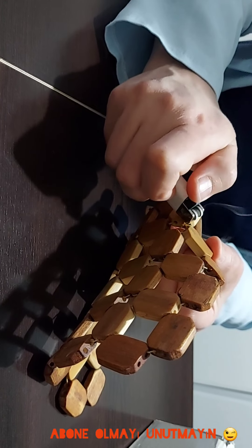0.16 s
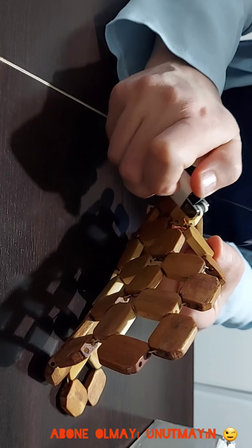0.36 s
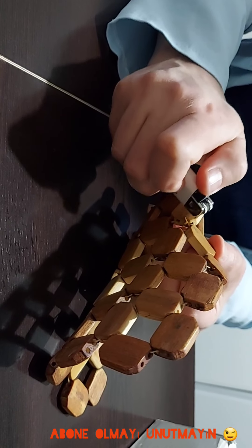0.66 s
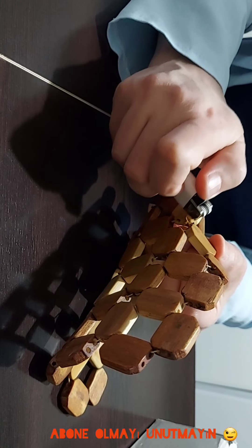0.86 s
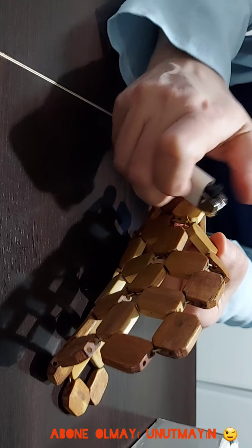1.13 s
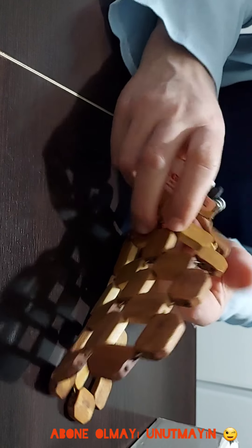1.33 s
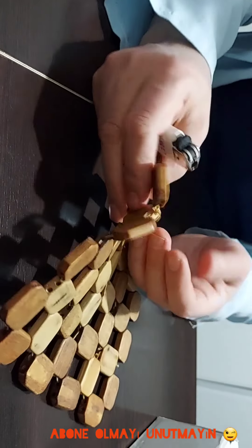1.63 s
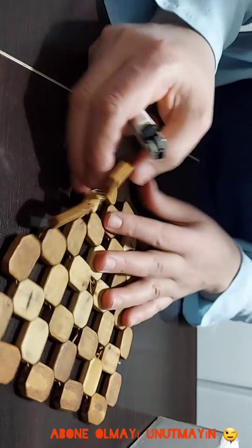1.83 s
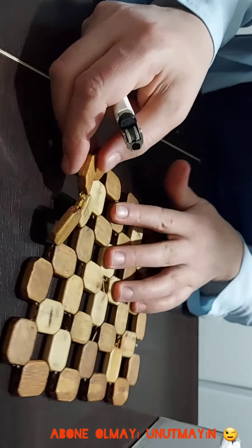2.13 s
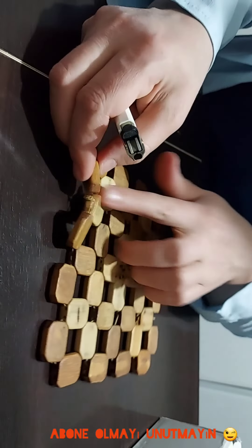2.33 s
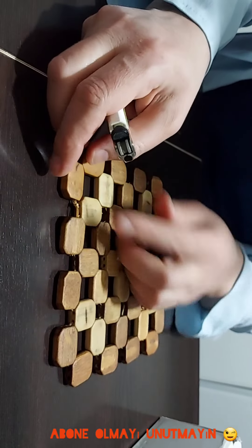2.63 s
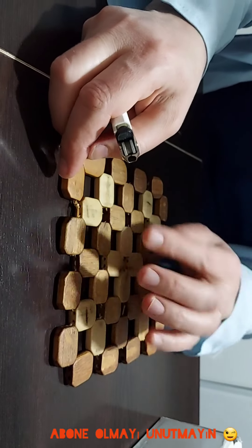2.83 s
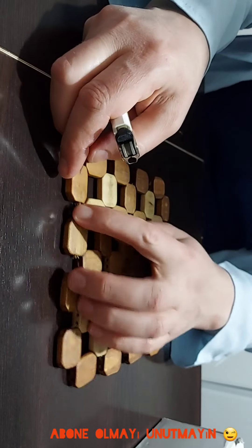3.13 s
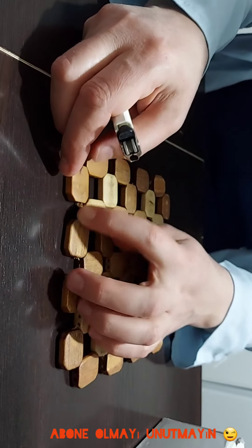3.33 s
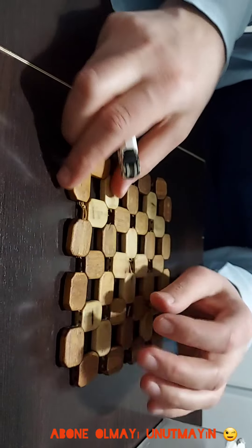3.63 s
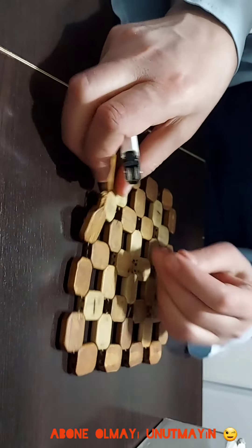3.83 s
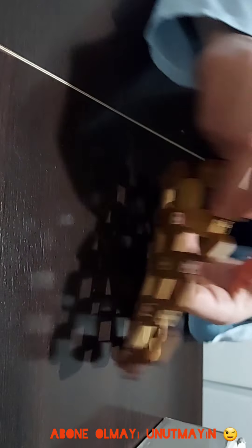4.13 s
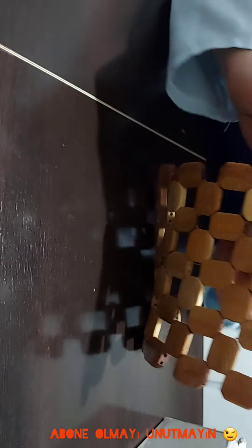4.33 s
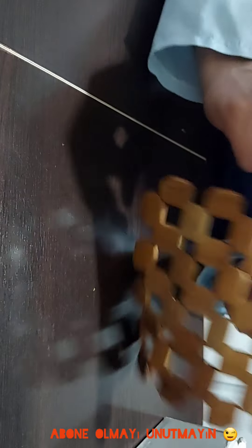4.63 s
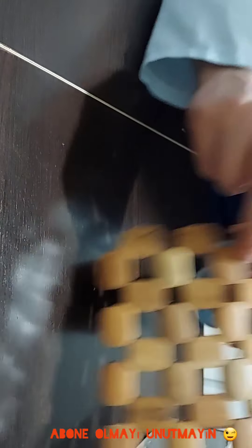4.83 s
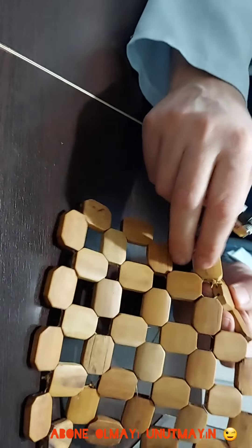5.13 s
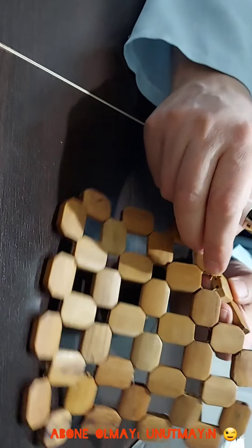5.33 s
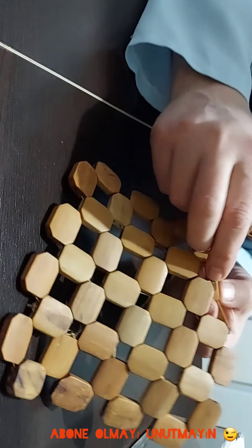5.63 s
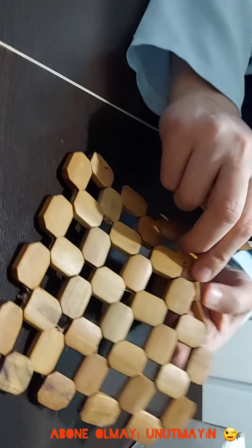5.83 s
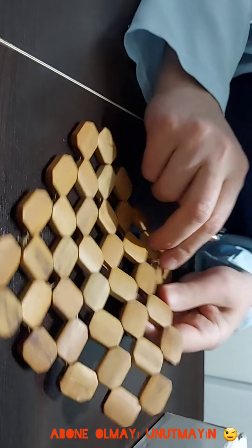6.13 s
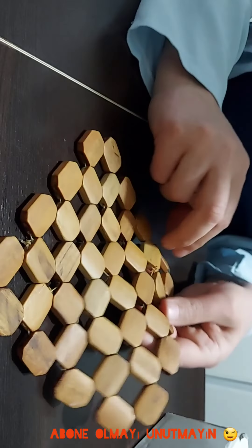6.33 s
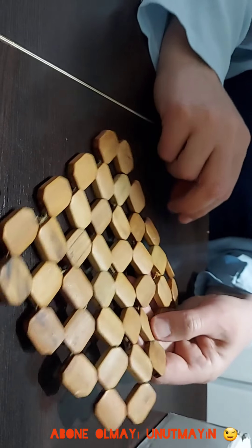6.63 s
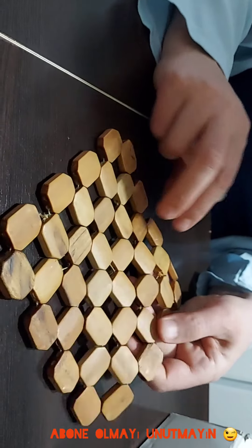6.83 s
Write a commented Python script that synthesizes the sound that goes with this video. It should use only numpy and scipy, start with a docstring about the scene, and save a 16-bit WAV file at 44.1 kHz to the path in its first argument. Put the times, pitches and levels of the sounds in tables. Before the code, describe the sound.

Small wooden tiles on cord click and clack sharply against each other, land on a tabletop with a dense short rattle, and are picked up again in a bare room.

```python
"""An engine outside hums and rushes at first and fades, while a mat of small wooden tiles strung on cord gives thin ticks.
The mat is turned over, laid flat near five seconds, where its tiles rattle as they settle, and picked up again.
Tiles clack with short rings, the tabletop booms, and filtered noise makes the rustle of sleeves and scrape of wood.
Decaying noise adds the echoes of a bare room."""
import sys
import numpy as np
from scipy import signal
from scipy.io import wavfile
from scipy.ndimage import uniform_filter1d

SR = 44100
rng = np.random.default_rng(int(sys.argv[2]) if len(sys.argv) > 2 else 0)


def waveform_to_disk(signal):
    """Save audio, clipped to [-1, 1], as 16-bit WAV at the path in sys.argv[1]."""
    frames = np.transpose(np.atleast_2d(signal))
    scaled = np.clip(frames, -1, 1) * 32767
    samples = np.round(scaled).astype(np.int16)
    wavfile.write(sys.argv[1], SR, samples)


N = 307818
TIME = np.arange(N) / SR
# thud level of a usual contact, relative to its ring (dB)
THUD_DB = -14.0

# the ringing tones of one tile of ordinary size: f/Hz, level/dB, time to fall by 60 dB t60/s
TILE_MODES = [(1810, -14.5, 0.048), (2440, -3, 0.033), (2780, 1.5, 0.032), (3354, -4, .021),
              (3792, -1.5, 0.034), (4274, 0, 0.022), (4878, -4, 0.022), (5337, -1, 0.013),
              (7230, -5, 0.015), (7515, -3, 0.018), (9360, 4.5, 0.0091), (11700, -29, 0.013),
              (14600, -35, 0.01)]


def from_db(db):
    """Turn decibels into a gain."""
    return 10 ** (np.asarray(db) / 20)


def rms_one(x):
    """Scale to an rms of 1."""
    return x / np.sqrt(np.mean(x ** 2) + 1e-20)


def in_time(rows):
    """Read each column of a timed table at every sample."""
    s, *columns = np.transpose(rows)
    return [np.interp(TIME, s, column) for column in columns]


def at_hz(points, hz):
    """Read a table between its points, on a log-frequency axis."""
    table_hz, values = np.transpose(points)
    return np.interp(np.log(hz), np.log(table_hz), values)


def band_pass(x, low_hz, high_hz, order=2):
    """Keep only the sound between two frequencies."""
    sos = signal.butter(order, [low_hz, high_hz], "band", fs=SR, output="sos")
    return signal.sosfilt(sos, x)


def drift(rate_hz):
    """Make a slowly wandering random curve with spread 1."""
    step = 40  # samples between computed points
    r = np.exp(-2 * np.pi * rate_hz * step / SR)
    noise = rng.standard_normal(N // step + 2002)
    slow = signal.lfilter([1], [1, -2 * r, r * r], noise)[2000:]  # drop the filter's start-up
    return np.interp(np.arange(N) / step, np.arange(len(slow)), rms_one(slow))


def add(out, s, sound):
    """Mix a sound in at time s."""
    start = round(s * SR)
    out[:, start:start + sound.shape[1]] += sound[:, :N - start]


def place(sound, pan_db, lag_ms):
    """Lean a sound left (positive pan) at constant power and delay it at the right microphone."""
    t = np.arange(sound.shape[1]) / SR
    right = np.interp(t - lag_ms / 1000, t, sound[1], left=0)
    lean = pan_db / 2
    return np.array([sound[0], right]) * rms_one(from_db([[lean], [-lean]]))


def diffuse_bands(size):
    """Split stereo noise into narrow bands that sum to white; the sides are alike only in the bass."""
    # how alike left and right are in sound from all around: f/Hz, correlation/1
    likeness = [(60, .93), (250, .82), (500, .42), (1000, .02), (2000, -.22), (5000, -.1), (14000, .05)]
    edges = 22 * 2 ** np.arange(0, 9.7, .4)
    white = rng.standard_normal((2, 2, size))
    bands = []
    for k, (low, high) in enumerate(zip(edges, edges[1:])):
        # neighbouring bands use different noise
        mid, side = band_pass(white[k % 2], low, high)
        hz = np.sqrt(low * high)
        alike = at_hz(likeness, hz)
        shared = np.sqrt((1 + alike) / 2) * mid
        opposed = np.sqrt((1 - alike) / 2) * side * [[1], [-1]]
        bands.append((hz, shared + opposed))
    return bands


def coloured(bands, spectrum):
    """Weight noise bands by a spectrum and scale to rms 1."""
    return rms_one(sum(from_db(at_hz(spectrum, hz)) * noise for hz, noise in bands))


def ring(modes, t, size_ratio, spread_db):
    """Sum struck, dying tones; each reaches each microphone with its own strength and sign."""
    hz, db, t60 = np.transpose(modes)[:, :, None]
    shape = (2, len(modes))
    strength = from_db(rng.normal(0, spread_db, shape)) * rng.choice([-1, 1], shape)
    tones = from_db(db - 60 * t / t60) * np.sin(2 * np.pi * hz * size_ratio * t)
    return strength @ tones


def still_air(bands):
    """The quiet of the room is steady coloured noise."""
    # colour of the quiet: f/Hz, relative level/dB per Hz
    quiet = [(15, -38), (25, -10), (72, 7), (137, -1), (180, -8), (416, -20.5), (754, -19), (1400, -13),
             (2350, -20.5), (3080, -28), (7510, -25.5), (9320, -33.5), (16000, -46.5)]
    return from_db(-66) * coloured(bands, quiet)[:, ::-1]  # reversed in time


def engine_hum(pitch_hz, hum_db, far_hum_db=-69.5, waver_db=-0.7, pan_db=-3.7):
    """The engine's firing tone is a wavering sine that fades to a far drone."""
    gain = np.hypot(from_db(hum_db), from_db(far_hum_db)) * from_db(waver_db * drift(5))
    hum = np.sqrt(2) * np.sin(2 * np.pi * np.cumsum(pitch_hz) / SR) * gain
    return place(np.array([hum, hum]), pan_db, 0)


def engine_rush(bands, hum_db, start_db=-45.4, share_of_fall=0.58):
    """The engine's rush is coloured noise that falls by a share of the hum's fall in decibels."""
    # colour of the rush: f/Hz, relative level/dB per Hz
    rush = [(30, 1.5), (60, 13), (100, 7.5), (135, 16), (175, -1), (250, 13), (380, -8), (550, -0.5),
            (800, 6), (1150, 5), (1700, -4), (2600, -14), (4500, -24.5), (9000, -36)]
    return from_db(start_db + share_of_fall * (hum_db - hum_db[0])) * coloured(bands, rush)


def background(fade_db_per_s=11, rush_pan_db=-3.5, hiss_db=-80.0):
    """The engine comes through the walls over the room's still air and the microphones' hiss."""
    # the engine while it is close: t/s, f/Hz, hum level/dB
    engine = [(0.03, 74.6, -36), (0.562, 75, -40.5), (1.296, 74.7, -51), (1.47, 73.2, -64)]
    pitch_hz, hum_db = in_time(engine)
    hum_db = hum_db - fade_db_per_s * np.maximum(TIME - engine[-1][0], 0)
    bands = diffuse_bands(N)
    noise = engine_rush(bands, hum_db) + still_air(bands)
    microphone_hiss = from_db(hiss_db) * rng.standard_normal((2, N))
    return engine_hum(pitch_hz, hum_db) + place(noise, rush_pan_db, 0) + microphone_hiss


def room_response(nearest_wall_s=0.00076, thicken_s=0.009, uneven_db=6.0):
    """Wall echoes thicken within milliseconds into a tail whose treble dies first."""
    # how long echoes last: f/Hz, time to fall by 60 dB t60/s
    decay_times = [(100, .62), (260, .58), (700, .55), (1840, .46), (4850, .41), (8000, .38), (14000, .3)]
    # strength of the tail before it is shaped: f/Hz, level re direct sound/dB
    tail_levels = [(100, 7.5), (400, -3.5), (1000, 1.5), (1800, -2), (2800, -6), (5000, -8), (8000, -13),
                   (14000, -5)]
    t = np.arange(SR) / SR
    tail = 0
    for hz, noise in diffuse_bands(SR):
        t60 = at_hz(decay_times, hz)
        one_energy = np.sqrt(np.log(1e6) / (t60 * SR))  # long and short decays carry equal energy
        tail = tail + noise * from_db(at_hz(tail_levels, hz) - 60 * t / t60) * one_energy
    # early lumps stand out of the wash like single reflections
    lump = rms_one(uniform_filter1d(rng.standard_normal(SR), size=50))
    lumps = from_db(uneven_db * lump * np.exp(-t / 0.045))
    return tail * lumps * np.clip((t - nearest_wall_s) / thicken_s, 0, 1)


def room(x):
    """Sound thrown to either side takes its own paths round the walls to both microphones."""
    echoes = [signal.fftconvolve(side[None], room_response(), axes=1)[:, :N] for side in x]
    return sum(echoes) / np.sqrt(2)


def tabletop(slap_t60=.05, slap_per_softness=-1.0, low_hz=430, high_hz=1400):
    """The board booms when mat or hand lands: soft landings favour its low tones, hard ones slap."""
    # landings: t/s, relative level/dB, softness (tilt towards the bass)/dB per octave
    bumps = [(1.9027, -51, 7.5), (2.462, -49, 6), (3.1123, -58.5, 7), (3.3048, -59, 6), (4.9333, -42, -0.5),
             (4.9606, -32, -3), (5.4474, -59, 3), (6.1754, -57, 5.5), (6.4307, -56, -4), (6.889, -56, -4.5)]
    # the board's tones before a slight lowering: f/Hz, level/dB, time to fall by 60 dB t60/s
    table_modes = [(59.5, -11, 0.13), (91.5, -11.5, 0.099), (130, -12, .09), (188.5, -6.5, 0.039),
                   (250, -2, .06), (324, 1.5, 0.063), (466, 2, 0.038), (540, 0, 0.038), (579, 0.5, 0.075),
                   (730, 4.5, 0.07)]
    out, t, modes = np.zeros((2, N)), np.arange(SR // 2) / SR, np.array(table_modes)
    octaves_down = np.log2(modes[:, :1].mean() / modes[:, :1])
    for s, db, softness in bumps:
        tilted = modes + softness * octaves_down * [0, 1, 0]
        boom = ring(tilted, t, 0.97, spread_db=1.85)[:1]  # the same on both sides
        noise = rms_one(band_pass(rng.standard_normal((2, len(t))), low_hz, high_hz))
        slap = noise * from_db(slap_per_softness * softness - 60 * t / slap_t60)
        add(out, s, from_db(db) * (boom + slap))
    return out


def bell(s, length_s, rise_share=.45, end_db=-6.0):
    """A stroke swells and falls; give its samples and its gain."""
    near = slice(max(round((s - 2 * length_s) * SR), 0), round((s + 2 * length_s) * SR))
    t = TIME[near] - s
    side_s = length_s * np.where(t < 0, rise_share, 1 - rise_share)
    return near, from_db(end_db * (t / side_s) ** 2)  # end_db holds at the stroke's two ends


def stroke_gains():
    """The hands' strokes raise and lower the gains of sleeve, scrape and cord."""
    # strokes that shift the mat: t/s at the height, length/s,
    # then relative levels of sleeve rustle/dB, tile scrape/dB, cord hiss/dB
    strokes = [(1.222, 0.38, -76, -67, -70), (1.442, .1, -61, -58, -78), (1.755, 0.045, -67, -59, -59),
               (1.85, .2, -62.5, -62, -72.5), (2.272, 0.37, -51, -52, -67), (3.011, 0.13, -69, -80, -70),
               (3.44, .11, -62.5, -59.5, -72.5), (3.855, 0.25, -56, -57.5, -66.5),
               (4.09, 0.29, -69, -66, -71.5), (4.31, .08, -65, -46, -57.5), (4.455, 0.074, -70, -60, -74),
               (4.65, .08, -63, -52, -69), (4.703, 0.039, -60, -44, -57), (5.464, 0.09, -53, -59, -67.5),
               (5.564, 0.32, -68, -67, -77), (6.081, 0.06, -62, -58, -68), (6.29, 0.29, -66.5, -72, -67.5),
               (6.43, .05, -58, -62, -72), (6.673, 0.12, -59, -58, -68.5), (6.91, .12, -63, -57, -76)]
    # between strokes, one number each for sleeve, scrape and cord: relative level/dB
    resting_db = [-78, -87, -94]
    power = from_db(resting_db)[:, None] ** 2 * np.ones(N)
    for s, length_s, *levels_db in strokes:
        near, gain = bell(s, length_s)
        power[:, near] += (from_db(levels_db)[:, None] * gain) ** 2
    return np.sqrt(power)


def jostle(per_s=500, size_db=3.0, ring_hz=3100, width_hz=1200):
    """Loose tiles touch lightly and at random, each ringing for a moment; rms 1."""
    t, out = np.arange(SR // 50) / SR, 0
    for size_ratio in np.linspace(.72, 1.02, 6):
        sizes = from_db(size_db * np.minimum(rng.exponential(1, N), 3))
        taps = (rng.random(N) < per_s / 6 / SR) * sizes
        tile = ring(TILE_MODES, t, size_ratio, spread_db=8.5)
        out = out + signal.oaconvolve(taps[None], tile, axes=1)[:, :N]
    # light touches wake mainly the lowest bending tones
    return rms_one(band_pass(out, ring_hz - width_hz, ring_hz + width_hz))


def catches(per_s=30, size_db=4.0, hardness_db=-3.0):
    """Edges catch on each other and let go in tiny dry clicks; rms 1."""
    sizes = from_db(size_db * np.minimum(rng.exponential(1, N), 3))
    return rms_one(shower((rng.random(N) < per_s / SR) * sizes, THUD_DB, hardness_db))


def handling(slip_db=-2.5, fibre_db=3.0, cloth_db=1.7, friction_db=-3.0, jostle_db=-2.0, catch_db=-7.0):
    """Cloth brushes smoothly; wood and cord slide in tiny uneven slips and the tiles jostle."""
    # colour of sleeve cloth: f/Hz, relative level/dB per Hz
    sleeve_colour = [(120, -1.5), (250, -2), (600, 1.5), (1100, 0.5), (1700, -6.5), (3000, -31)]
    # colour of wood scraping: f/Hz, relative level/dB per Hz
    scrape_colour = [(1000, -36.5), (1700, -4.5), (2400, -3.5), (3300, -5.5), (4600, 1), (6000, -15),
                     (9000, -42.5), (14000, -36.5)]
    # colour of cord hissing: f/Hz, relative level/dB per Hz
    cord_colour = [(4000, -25.5), (6000, 4.5), (7600, 6.5), (9500, -6), (12000, -38.5), (16000, -30.5)]
    sleeve_gain, scrape_gain, cord_gain = stroke_gains()
    bands = diffuse_bands(N)
    slips = (drift(75) + drift(360)) / np.sqrt(2)
    sleeve = rms_one(coloured(bands, sleeve_colour) * from_db(cloth_db * drift(36)))
    friction = rms_one(coloured(bands, scrape_colour) * from_db(slip_db * slips))
    wood = from_db(friction_db) * friction + from_db(jostle_db) * jostle() + from_db(catch_db) * catches()
    cord = rms_one(coloured(bands, cord_colour) * from_db(fibre_db * slips))
    return sleeve_gain * sleeve + scrape_gain * wood + cord_gain * cord


def grinding(slips_per_s=900, width_hz=270, upper_ratio=1.8, upper_db=-9.0, flutter_db=3.0):
    """A tile face grinds over its neighbour; uneven slips keep its lowest two bending tones ringing."""
    # grinds: t/s at the height, length/s, relative level/dB, pitch f/Hz
    grinds = [(1.44, .08, -52.5, 2600), (4.35, .1, -47, 2500), (4.47, .08, -58, 2250),
              (4.655, .09, -51, 2350), (5.93, .09, -63, 2300), (6.67, .1, -59, 2550),
              (6.92, .08, -55, 2450)]
    out, flutter = np.zeros((2, N)), from_db(flutter_db * drift(35))
    slips = (rng.random(N) < slips_per_s / SR) * rng.standard_normal((2, N)) * flutter
    for s, length_s, db, hz in grinds:
        near, gain = bell(s, length_s)
        low_hz, high_hz = hz - width_hz, hz + width_hz
        low = rms_one(band_pass(slips[:, near], low_hz, high_hz))
        upper = rms_one(band_pass(slips[:, near], low_hz * upper_ratio, high_hz * upper_ratio))
        out[:, near] += from_db(db) * gain * (low + from_db(upper_db) * upper)
    return out


def ticks(crack_db=-2.0, crack_t60=0.021, low_hz=4000, high_hz=9500):
    """Small bright contacts, a few short tones and a dry crack, while the mat's corner is held still."""
    # ticks: t/s, burst level/dB, left over right/dB
    tick_times = [(0.2121, -43.5, -2), (0.5701, -46, 1), (0.843, -45, 6), (1.0835, -43, 5)]
    # tones of a tick before a small random shift: f/Hz, level/dB, time to fall by 60 dB t60/s
    tick_modes = [(2647, -2.5, .022), (4150, -4, .009), (5200, 1.5, .008), (7250, 0, .008), (8500, 1, .007)]
    out, t = np.zeros((2, N)), np.arange(SR // 20) / SR
    for s, db, pan_db in tick_times:
        burst = rng.standard_normal((2, len(t))) * from_db(-60 * t / crack_t60)
        crack = rms_one(band_pass(burst, low_hz, high_hz, order=4))
        tones = rms_one(ring(tick_modes, t, 1 + 0.011 * rng.standard_normal(), spread_db=1.5))
        tick = rms_one(tones + from_db(crack_db) * crack) / np.sqrt(10)  # level counted over the first tenth
        add(out, s, place(from_db(db) * tick, pan_db, lag_ms=.25))
    return out


def band_levels(thud_db, hardness_db):
    """Levels of thud, ring, edge and snap relative to the ring; sharp corners snap."""
    return np.array([thud_db, 0, hardness_db, -13.8 + 1.3 * hardness_db])


def clack(levels_db, size_scatter=.025, scatter_db=-1.8, scatter_t60=0.026, top_hz=11000):
    """One contact: the tile's short ring, and a crack scattered by the neighbouring tiles and the hand."""
    # thud, ring, edge and snap of a knock, one row each: lowest f/Hz, highest f/Hz
    knock_bands = [(300, 1750), (1900, 5600), (5800, 8300), (8900, 16000)]
    t = np.arange(SR // 20) / SR
    tile = rms_one(ring(TILE_MODES, t, 1 + size_scatter * rng.standard_normal(), spread_db=0.0))
    low_pass = signal.butter(2, top_hz, fs=SR, output="sos")
    grain = signal.sosfilt(low_pass, rng.standard_normal((2, len(t))))
    crack = rms_one(grain * from_db(-60 * t / scatter_t60))
    click = rms_one(1.0 * (t == 0))
    strike = tile + from_db(scatter_db) * crack + .5 * click
    # flat faces thud, corners snap
    parts = [from_db(db) * rms_one(band_pass(strike, low, high, order=4))
             for db, (low, high) in zip(levels_db, knock_bands)]
    return sum(parts) / np.sqrt(10)  # a level counts the energy as if within the first tenth


def shower(clicks, thud_db, hardness_db, count=4):
    """A train of small contacts is dealt at random to a few tiles."""
    levels_db = band_levels(thud_db, hardness_db)
    dealt = rng.integers(0, count, len(clicks))
    out = 0
    for k in range(count):
        own_clicks = (clicks * (dealt == k))[None]
        out = out + signal.oaconvolve(own_clicks, clack(levels_db), axes=1)[:, :len(clicks)]
    return out


def rattle(landing_s=4.962, per_s=260, first_db=-39.0, fall_db_per_s=100.0, spread_db=2.0,
           hardness_db=-11.0, thud_db=-3.0):
    """After the mat lands flat, its other tiles drop and settle in a dense, dying run."""
    out, t = np.zeros((2, N)), np.arange(SR // 4) / SR
    sizes = from_db(first_db - fall_db_per_s * t + spread_db * rng.standard_normal(len(t)))
    clicks = (rng.random(len(t)) < per_s / SR) * sizes
    add(out, landing_s, shower(clicks, thud_db, hardness_db))
    return out


def knocks(thud_per_db=-.12, usual_db=-35.5, right_lag_ms=.44, far_crack_db=1.5, room_db=0.5):
    """Tiles strike each other; give the direct sound and what they send into the room."""
    # light touches to the mat's landing: t/s, ring burst level/dB, hardness (treble re ring)/dB, left over right/dB
    contacts = [(1.5302, -34, -16, -1), (1.5396, -43, 5.5, 3), (1.546, -32.5, -10, 0),
                (1.6122, -34.5, -2, 4), (1.7661, -37, -7, 0), (1.8854, -31.5, -12, -4),
                (1.8944, -30, -16.5, 7.5), (1.902, -22, 1, -1), (1.9096, -24.5, 1, 0),
                (1.9222, -32, -6.5, 4), (1.9293, -31.5, -1, 0), (1.9884, -37, -12.5, 2),
                (2.1996, -48.5, -22, 5), (2.24, -40, -5, -1), (2.4377, -38, -24.5, 0.5),
                (2.4605, -15.5, -15, 0), (2.4708, -35.5, 1, -5), (2.6295, -33.5, -5, 0),
                (2.6318, -38, -7, -2), (2.6804, -33.5, -1, 0), (3.1044, -37, -5, -2), (3.1108, -27, 2, 0),
                (3.1134, -27.5, 3.5, -4), (3.2697, -55, -10, 0), (3.3914, -45.5, -7.5, 4),
                (3.4518, -51.5, -7, -1), (4.2976, -35, -9, 1), (4.3013, -36, -10.5, -2),
                (4.3637, -38, -16.5, 0), (4.7018, -45.5, -9, -5), (4.9315, -23, -12.5, 0),
                (4.9588, -21.5, -12, 1), (4.9677, -13, -10, 0), (5.0616, -21.5, -9, -2),
                (5.31, -57, -28, 0), (5.7201, -48, -9.5, 0.5), (6.0868, -28, -7, 0), (6.1745, -34, -15, 3),
                (6.1811, -38, -9, -7), (6.3113, -61.5, 1.5, -5), (6.4307, -31.5, -6.5, -3),
                (6.4472, -38, -8, -2), (6.8622, -37.5, -11.5, 0), (6.888, -32, -16, 0),
                (6.9214, -45, -20, -2)]
    direct, sent = np.zeros((2, 2, N))
    for s, db, hardness_db, pan_db in contacts:
        # hard blows favour the ring over the thud
        thud_db = THUD_DB + thud_per_db * (db - usual_db)
        levels_db = db + band_levels(thud_db, hardness_db)
        # the mat lies nearer the left microphone
        add(direct, s, place(clack(levels_db), pan_db, right_lag_ms))
        # both touching tiles radiate their own mix of tones towards the walls
        one = clack(levels_db, scatter_db=far_crack_db)
        other = clack(levels_db, scatter_db=far_crack_db) * [[1], [-1]]
        add(sent, s, (one + other) / np.sqrt(2))
    return direct, from_db(room_db) * sent


def scene(rubbing_db=-3.5, rubbing_room_db=-6.5, board_room_db=-1.5, tick_room_db=4.5, rattle_room_db=-4.0):
    """Mat, table and hands sound close by, with the room around them."""
    direct, sent = knocks()
    board, tick, settling = tabletop(), ticks(), rattle()
    rub = from_db(rubbing_db) * (handling() + grinding())
    sent = sent + from_db(board_room_db) * board + from_db(rubbing_room_db) * rub
    sent = sent + from_db(tick_room_db) * tick + from_db(rattle_room_db) * settling
    return background() + room(sent) + board + rub + tick + settling + direct


def record(dry, treble_db=(-2.0, 1.5), shelf_hz=4500, cutoff_hz=16200):
    """The right microphone is the brighter one; full scale limits the peaks; the top is cut."""
    treble = signal.sosfilt(signal.butter(1, shelf_hz, "high", fs=SR, output="sos"), dry)
    heard = dry + (from_db(treble_db)[:, None] - 1) * treble
    top_cut = signal.ellip(10, .1, 80, cutoff_hz, fs=SR, output="sos")
    return signal.sosfilt(top_cut, np.clip(heard, -1, 1))


dry = scene()
out = record(dry)
waveform_to_disk(out)
```